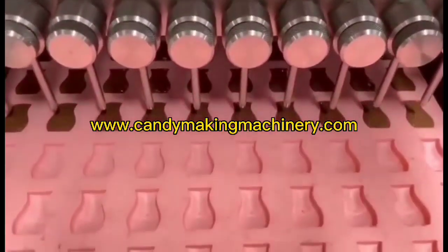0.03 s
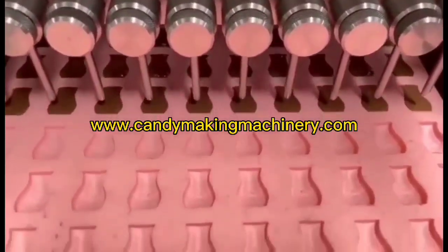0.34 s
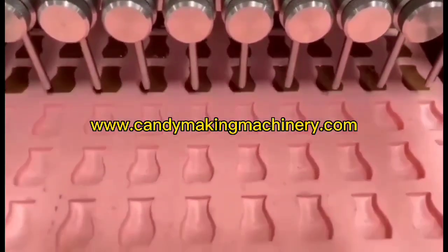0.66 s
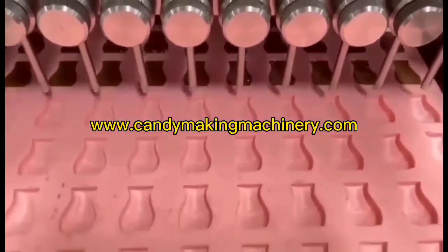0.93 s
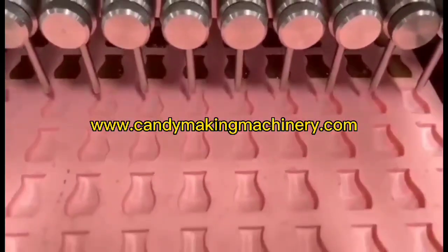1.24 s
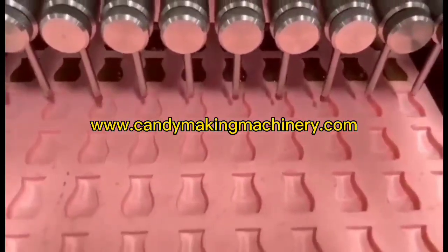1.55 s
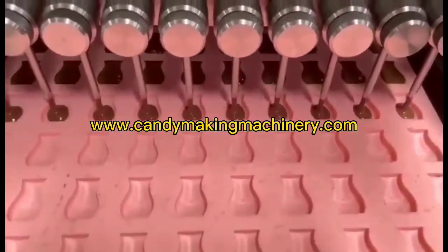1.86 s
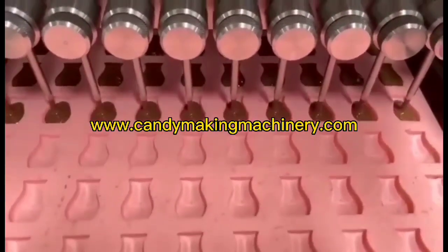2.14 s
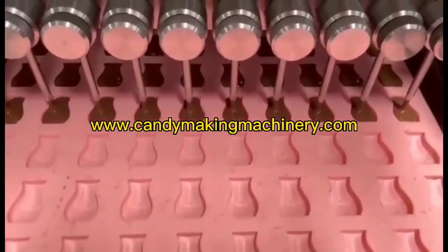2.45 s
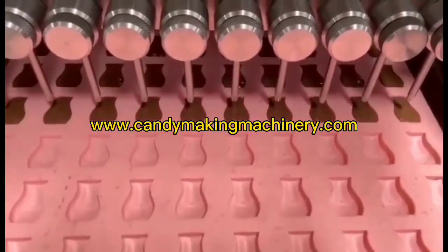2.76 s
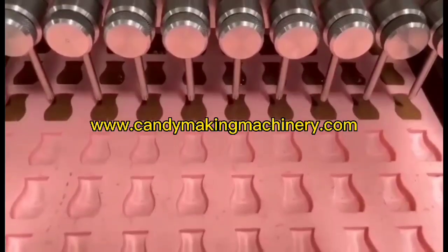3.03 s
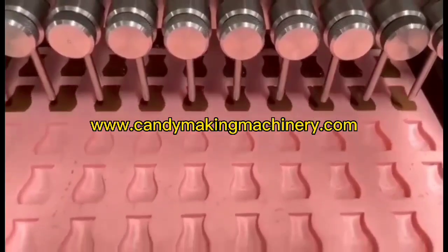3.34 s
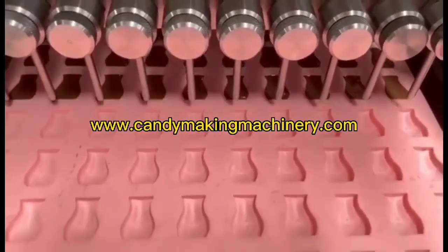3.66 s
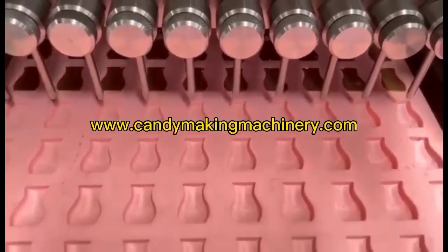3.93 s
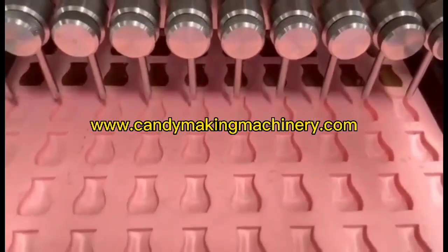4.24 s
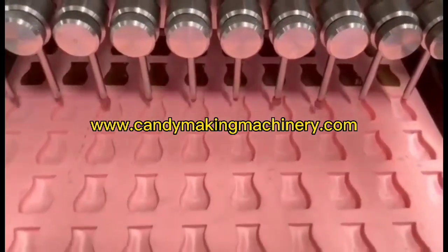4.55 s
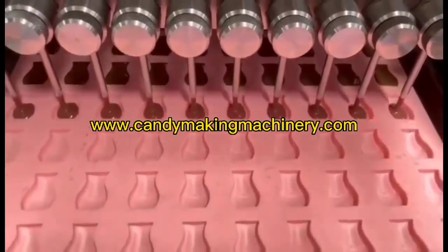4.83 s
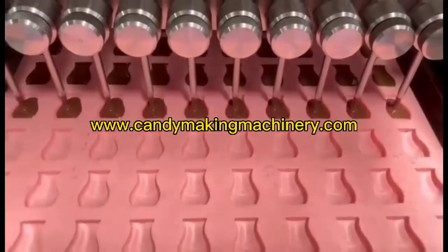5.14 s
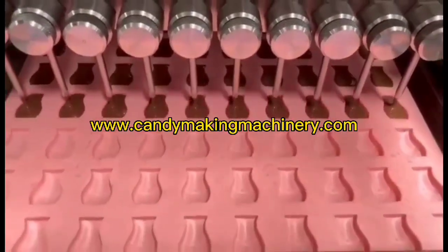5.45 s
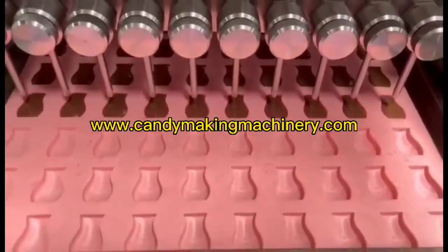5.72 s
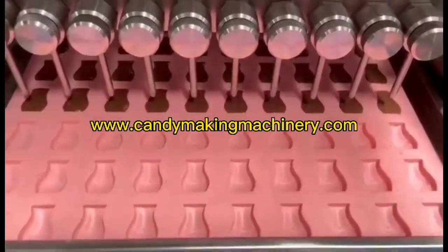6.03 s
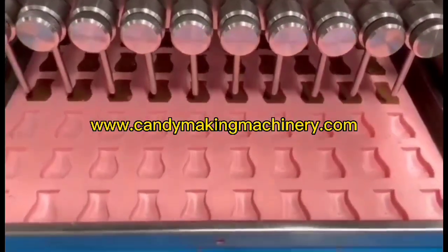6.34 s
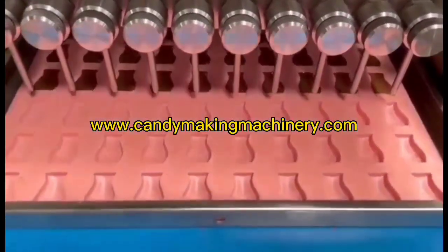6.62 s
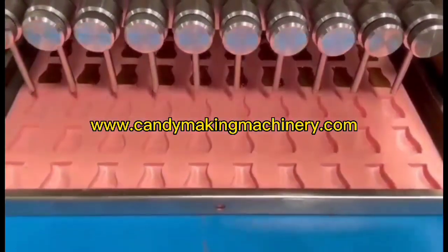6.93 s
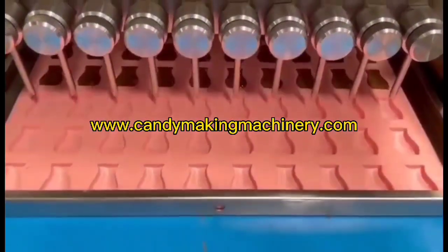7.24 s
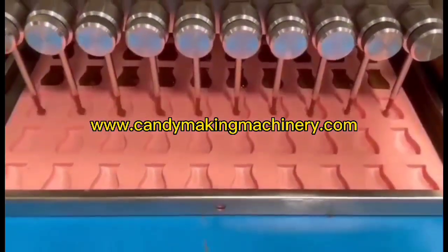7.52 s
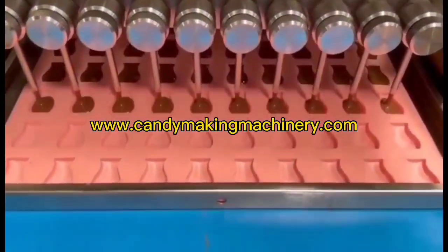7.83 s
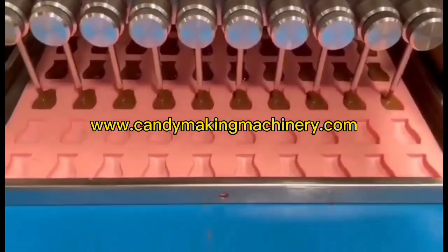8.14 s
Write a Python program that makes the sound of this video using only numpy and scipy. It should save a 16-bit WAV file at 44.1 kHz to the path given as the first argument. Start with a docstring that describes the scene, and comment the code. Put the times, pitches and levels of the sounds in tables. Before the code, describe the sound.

Compressed air leaks and vents in bright bursts while a small factory machine hums, rumbles and knocks softly.

```python
"""A small factory hall, one microphone close to the nozzles of a candy depositor filling trays of moulds.
The drive hums on the orders of one shaft over the rumble of the machinery. Compressed air leaks all
the time and vents in gusts of turbulent noise, some thin and bright, some broad and rushing, with a
few short spits; strong jets half whistle on an edge. Soft knocks of the mechanism ring the frame,
a faint drone comes and goes, and near the end a tray rubs on its guides."""
import sys
import numpy as np
from scipy import signal
from scipy.fft import rfft, irfft, next_fast_len
from scipy.io import wavfile

SR = 44100
rng = np.random.default_rng(int(sys.argv[2]) if len(sys.argv) > 2 else 0)


def to_wav(sig):
    """Store sig (one row per channel, or 1-D mono) as 16-bit WAV at the path in sys.argv[1].

    Samples outside -1..1 are clipped; the rate is SR.
    """
    pcm = np.clip(np.atleast_2d(sig), -1, 1) * 32767
    pcm = np.round(pcm).astype(np.int16)
    wavfile.write(sys.argv[1], SR, pcm.T)  # frames by channels


N = 369558
TIME_S = np.arange(N) / SR


def from_db(db):
    """Decibels to gain."""
    return 10 ** (np.asarray(db) / 20)


def unit_rms(x):
    """Scale to rms 1."""
    return x / np.sqrt(np.mean(x ** 2) + 1e-20)


def curves(rows):
    """Columns of a time table, interpolated per sample."""
    times_s, *columns = np.transpose(rows)
    return [np.interp(TIME_S, times_s, column) for column in columns]


def spectrum_db(spectrum, hz):
    """Spectrum interpolated on a log-frequency axis."""
    points_hz, db = np.transpose(spectrum)
    return np.interp(np.log(hz), np.log(points_hz), db)


def drift(rate_hz):
    """Random wander of rms 1: noise low-passed at rate_hz."""
    step, settle = 40, 2000
    pole = np.exp(-2 * np.pi * rate_hz * step / SR)
    white = rng.standard_normal(N // step + settle + 2)
    slow = signal.lfilter([1], [1, -2 * pole, pole * pole], white)[settle:]
    return np.interp(np.arange(N) / step, np.arange(len(slow)), unit_rms(slow))


def noise(spectrum):
    """Coloured noise of rms 1, falling 20 dB/octave past the spectrum's ends."""
    hz = np.maximum(np.arange(N // 2 + 1) * SR / N, 1)
    octaves_outside = np.abs(np.log2(hz / np.clip(hz, spectrum[0][0], spectrum[-1][0])))
    gain = from_db(spectrum_db(spectrum, hz) - 20 * octaves_outside)
    size = next_fast_len(N)
    bin_gain = np.interp(np.arange(size // 2 + 1) * SR / size, hz, gain)
    return unit_rms(irfft(rfft(rng.standard_normal(size)) * bin_gain, size)[:N])


def resonance(x, hz, width_hz):
    """Two-pole band-pass, peak gain 1."""
    r = np.exp(-np.pi * width_hz / SR)
    feedback = [1, -2 * r * np.cos(2 * np.pi * hz / SR), r * r]
    return signal.lfilter(np.array([1, 0, -1]) * (1 - r * r) / 2, feedback, x)


def tone(hz, waver_db, rate_hz, wander_hz=0):
    """Sine near rms 1 with wavering level and optional pitch wander."""
    turns = np.cumsum(hz + wander_hz * drift(rate_hz)) / SR + rng.random()
    return np.sqrt(2) * np.sin(2 * np.pi * turns) * from_db(waver_db * drift(rate_hz))


def gliding_bands(rows, width_hz, fade_s):
    """One narrow noise band per row: swells, glides, fades."""
    baseband = (drift(width_hz) + 1j * drift(width_hz)) / np.sqrt(2)
    out = np.zeros(N)
    for start_s, length_s, first_hz, last_hz, db in rows:
        span = (TIME_S >= start_s) & (TIME_S < start_s + length_s)
        age_s = TIME_S[span] - start_s
        swell = np.sin(np.pi / 2 * np.clip(np.minimum(age_s, length_s - age_s) / fade_s, 0, 1))
        turns = np.cumsum(first_hz + (last_hz - first_hz) * age_s / length_s) / SR
        wander = np.roll(baseband, rng.integers(N))[span]
        out[span] += np.sqrt(2) * from_db(db) * swell * np.real(wander * np.exp(2j * np.pi * turns))
    return out


def shifting_echoes(x, echo_db, rate_hz, longest_s, count):
    """Short reflections off moving steel: a wandering comb, power kept."""
    echoes, power = 0, 0
    for delay_s in np.linspace(.001, longest_s, count) * rng.uniform(.9, 1.1, count):
        gain = drift(rate_hz)
        echoes = echoes + gain * np.pad(x, (int(delay_s * SR), 0))[:N]
        power = power + gain ** 2
    wet = from_db(echo_db)
    return (x + wet * echoes / np.sqrt(power)) / np.sqrt(1 + wet ** 2)


# machine load (time [s], rumble [dB], drive hum [dB], frame whirr [dB])
LOAD = [(0.0, -48, -47.5, -46), (0.25, -45.5, -46, -43.5), (0.55, -47, -45.5, -49), (0.95, -45, -43, -44),
        (1.25, -47, -44.5, -43), (1.55, -44, -40, -43.5), (1.8, -44, -43.5, -46.5),
        (2.65, -43, -40.5, -44.5), (3.1, -40, -42, -41.5), (3.45, -41.5, -42, -43),
        (4.15, -41.5, -42, -43.5), (4.7, -44.5, -39.5, -39.5), (5.05, -42, -41.5, -41.5),
        (5.47, -39.5, -42.5, -41), (5.8, -43.5, -40, -43.5), (7.05, -45.5, -46, -44.5),
        (7.45, -43.5, -45, -44.5), (7.78, -49.5, -45.5, -39.5), (8.25, -44, -43.5, -49)]
# noise colours (frequency [Hz], relative density [dB])
RUMBLE_SPECTRUM = [(20, -18), (35, -14), (50, -5), (76, 4.5), (92, -5.5), (135, -1.5), (175, -1.5),
                   (225, -5), (275, -0.5), (330, -8.5), (450, -19), (900, -47)]
WHIRR_SPECTRUM = [(220, -2.5), (320, -6.5), (380, -2.5), (430, 0.5), (490, -4), (570, 0), (660, -10),
                  (800, -11), (1200, -12.5), (2500, -47)]
# drive partials (order [x shaft rate])
SHAFT_ORDERS = (7, 8, 14, 20)
# their weights (level [dB re drive hum])
ORDER_LEVELS_DB = [-1.4, -7.5, -15, -18.5]
# mains and other motors (frequency [Hz], level [dB], pitch wander [Hz])
MOTORS = [(50, -61.5, 0), (100, -60.5, 0), (172, -55, 1.8), (273, -56.5, 3.5), (488, -62, 0.5),
          (613.5, -62.5, 0.7)]

def machinery(shaft_hz=29.655):
    """Shaft orders, rumble and frame whirr follow the load; mains and other motors hum beside them."""
    rumble_db, hum_db, whirr_db = curves(LOAD)
    drive = sum(from_db(db) * tone(order * shaft_hz, waver_db=2.5, rate_hz=31)
                for order, db in zip(SHAFT_ORDERS, ORDER_LEVELS_DB))
    motors = sum(from_db(db) * tone(hz, waver_db=4, rate_hz=4.57, wander_hz=wander_hz)
                 for hz, db, wander_hz in MOTORS)
    rumble = from_db(rumble_db + 1.6 * drift(14)) * noise(RUMBLE_SPECTRUM)
    whirr_gain = from_db(whirr_db + 1.3 * drift(19))
    whirr = shifting_echoes(noise(WHIRR_SPECTRUM), echo_db=-3, rate_hz=5, longest_s=.025, count=12)
    return from_db(hum_db) * drive + motors + rumble + whirr_gain * whirr


# constant leak (time [s], hiss [dB], sizzle [dB], rush [dB])
LEAK = [(0.0, -38.5, -45.5, -46.5), (0.62, -45.5, -46, -49.5), (1.0, -42, -40.5, -46),
        (1.6, -43.5, -46.5, -48.5), (1.95, -43, -47, -54), (2.4, -45, -50.5, -51), (2.91, -45, -51, -47.5),
        (3.0, -40.5, -39.5, -47.5), (3.55, -38.5, -39, -49), (4.05, -41.5, -40, -46), (4.5, -35, -40, -39),
        (5.0, -36.5, -40.5, -36), (5.5, -37, -44, -38), (5.82, -40.5, -37, -45), (6.7, -36, -40.5, -47.5),
        (6.765, -41.5, -41.5, -45), (6.83, -35.5, -39.5, -41.5), (7.28, -41, -45.5, -43.5),
        (7.7, -41.5, -42, -50.5), (7.85, -44, -44.5, -46), (8.38, -39.5, -40.5, -41)]
# vented gusts (start [s], attack [s], hold [s], hiss [dB], hiss centre [Hz],
# sizzle [dB re hiss], rush [dB re hiss])
GUSTS = [(0.01, 0.071, 0.028, -32, 3730, -9.5, -14), (0.236, 0.025, 0.025, -30, 4840, -14, -30),
         (0.335, .03, 0.13, -43, 3700, -5, -1), (0.733, 0.034, 0.061, -42.5, 3850, 2.5, -5),
         (0.989, 0.039, 0.08, -35.5, 4120, -4.5, -5.5), (1.172, 0.02, 0.011, -36, 3820, -2, -2),
         (1.323, 0.03, 0.082, -40.5, 3920, -1, -2), (1.507, 0.026, 0.089, -47, 4300, 6, -5),
         (2.948, 0.03, 0.035, -40, 4500, 3.5, -8), (3.27, 0.036, 0.071, -49, 4100, -10, -14),
         (3.644, .025, 0.04, -41.5, 4100, -17, 2), (4.138, 0.03, 0.044, -33.5, 3570, -3.5, -7.5),
         (4.214, 0.023, 0.039, -39.5, 3580, -20, -1.5), (4.57, 0.042, 0.044, -44, 4370, 8.5, -22),
         (4.788, 0.024, 0.062, -37.5, 3970, 0, -11), (5.01, 0.038, 0.2, -26, 4250, -8.5, -20),
         (5.243, 0.031, 0.08, -28.5, 3600, -8, -12), (5.51, 0.054, 0.065, -33, 3530, -7, -17),
         (5.615, 0.042, 0.19, -34, 6700, -11, -22), (5.85, 0.049, 0.2, -27.5, 4580, -5.5, -13.5),
         (6.106, 0.028, 0.065, -30, 4970, -16, -14), (6.189, 0.047, 0.22, -30.5, 3040, -14, -4),
         (6.444, 0.073, 0.048, -27.5, 5100, -3.5, -12.5), (6.582, 0.018, 0.02, -41, 4000, -10, 1),
         (6.81, 0.084, 0.18, -28.5, 4930, -6, -20), (7.01, 0.055, 0.14, -29, 5100, -11.5, -12),
         (7.301, 0.018, 0.022, -31, 4730, -11, -11), (7.369, 0.048, 0.033, -28, 4540, -5.5, -19),
         (7.47, 0.024, 0.018, -26, 4760, -7.5, -25), (7.541, 0.019, 0.023, -32.5, 3900, -2.5, -9),
         (7.815, 0.11, 0.31, -34, 4100, -5, -9.5), (7.965, 0.029, 0.058, -31, 4000, -3.5, -23)]

def airflow(leak_centre_hz=4180, release_db_per_s=189):
    """Leak and valve gusts add in power: hiss, sizzle and rush gains, power-weighted hiss centre."""
    hiss, sizzle, rush = [from_db(db) ** 2 for db in curves(LEAK)]
    weighted_hz = hiss * leak_centre_hz
    for start_s, attack_s, hold_s, db, centre_hz, sizzle_db, rush_db in GUSTS:
        first = int(start_s * SR)
        span = np.arange(first, min(first + SR, N))
        age_s = TIME_S[span] - start_s
        shut_s = np.maximum(age_s - attack_s - hold_s, 0)   # pressure collapses once the valve shuts
        power = (np.clip(age_s / attack_s, 0, 1) * from_db(db - release_db_per_s * shut_s)) ** 2
        hiss[span] += power
        weighted_hz[span] += power * centre_hz
        sizzle[span] += power * from_db(sizzle_db) ** 2
        rush[span] += power * from_db(rush_db) ** 2
    return np.sqrt(hiss), np.sqrt(sizzle), np.sqrt(rush), weighted_hz / hiss


def turbulence(spectrum, centre_hz, hump_db, hump_octaves, flicker_db, flicker_hz, bands):
    """Independently flickering noise bands under a spectral hump; power near 1."""
    edges_hz = np.geomspace(spectrum[0][0], spectrum[-1][0], bands + 1)
    white = rng.standard_normal((2, N))
    out, power = 0, 0
    for k, (low_hz, high_hz) in enumerate(zip(edges_hz, edges_hz[1:])):
        hz = np.sqrt(low_hz * high_hz)
        bandpass = signal.butter(2, [low_hz, high_hz], "band", fs=SR, output="sos")
        band = unit_rms(signal.sosfilt(bandpass, white[k % 2]))
        lift_db = hump_db * np.exp(-.5 * (np.log2(hz / centre_hz) / hump_octaves) ** 2)
        gain = from_db(spectrum_db(spectrum, hz) + lift_db) * np.sqrt(high_hz - low_hz)
        out = out + band * gain * from_db(flicker_db * drift(flicker_hz))
        power = power + gain ** 2
    return out / np.sqrt(power)


# air colours (frequency [Hz], relative density [dB])
HISS_SPECTRUM = [(1200, -10), (1900, 1.5), (2250, 4), (3200, 0), (4800, 2), (6400, 1), (7400, 2.5),
                 (9500, -39), (13000, 8)]
SIZZLE_SPECTRUM = [(4000, -47), (7000, 5), (8800, 9), (10000, 4), (11200, 6), (13500, -11)]
RUSH_SPECTRUM = [(400, -0.5), (600, 0.5), (900, -3), (1200, 1.5), (1700, -0.5), (2300, 2.5), (3500, -0.5),
                 (6000, -48)]
# edge tones at full force (frequency [Hz], width [Hz], gain [dB])
EDGE_TONES = [(4620, 300, -14), (5020, 200, -11), (5620, 60, -10)]
# spectral dips at full force (frequency [Hz], width [Hz], depth [0-1])
HISS_DIPS = [(1880, 320, 0.5), (7100, 750, 0.42)]

def jet(flutter_db=0.7, flutter_hz=54):
    """Turbulent hiss, thin sizzle and a low rush off nearby surfaces, fluttering together."""
    hiss_gain, sizzle_gain, rush_gain, centre_hz = airflow()
    force = np.clip((20 * np.log10(hiss_gain) + 54) / 18, 0, 1)   # 0 at -54 dB, 1 at -36 dB
    hiss = hiss_gain * turbulence(HISS_SPECTRUM, centre_hz, hump_db=17.8 * force, hump_octaves=1,
                                  flicker_db=2.5, flicker_hz=22, bands=16)
    hiss += force ** 2 * sum(from_db(db) * resonance(hiss, hz, width) for hz, width, db in EDGE_TONES)
    hiss -= force * sum(depth * resonance(hiss, hz, width) for hz, width, depth in HISS_DIPS)
    sizzle = turbulence(SIZZLE_SPECTRUM, centre_hz=12440, hump_db=7.3 * force, hump_octaves=0.07,
                        flicker_db=3.5, flicker_hz=15.3, bands=10)
    sizzle *= sizzle_gain * from_db(1.15 * drift(26))
    rush = rush_gain * from_db(drift(6)) * noise(RUSH_SPECTRUM)
    return (hiss + sizzle + rush) * from_db(flutter_db * drift(flutter_hz))


# panel and cavity resonances (frequency [Hz], width [Hz], gain [dB])
CAVITIES = [(1448, 55, -2.5), (2927, 30, -3), (3335, 55, -4), (3640, 80, -12), (3908, 50, -11),
            (4630, 32, -7), (6070, 120, -15), (6466, 35, -8)]

def steel_housing(air):
    """Air noise reflects off moving steel and rings in panels and cavities."""
    echoed = shifting_echoes(air, echo_db=-1, rate_hz=15.6, longest_s=.009, count=20)
    return echoed + sum(from_db(db) * resonance(echoed, hz, width) for hz, width, db in CAVITIES)


# blows of dosing mechanism and trays (time [s], level [dB], most excited pitch [Hz])
KNOCKS = [(0.24, -34, 520), (1.01, -29, 470), (1.193, -30, 1190), (1.518, -30.5, 760), (2.539, -35, 800),
          (4.419, -28, 760), (5.422, -29, 600), (6.021, -30, 540), (6.267, -28, 600), (7.33, -30, 720),
          (8.05, -32, 900)]
# frame modes (frequency [Hz], gain [dB], t60 [s])
FRAME_MODES = [(290, 2, 0.16), (370, -12, 0.051), (471, -2.5, 0.12), (557, -10.5, 0.16), (614, -10, 0.12),
               (725, -9, 0.096), (840, -6, 0.14), (1000, -12, 0.13), (1163, -5, 0.18), (1460, -8, 0.06)]

def knocks(spread_octaves=0.33, scatter_db=2.5):
    """Each blow rings the frame's modes, mostly those near its own pitch."""
    times_s, level_db, focus_hz = np.transpose(KNOCKS)
    onsets = np.round(times_s * SR).astype(int)
    random_db = rng.normal(0, scatter_db, (len(KNOCKS), len(FRAME_MODES)))
    out = np.zeros(N)
    for k, (hz, mode_db, t60_s) in enumerate(FRAME_MODES):
        coupling = np.exp(-.5 * (np.log2(hz / focus_hz) / spread_octaves) ** 2)
        blows = np.full(N, 1e-18)
        blows[onsets] = coupling * from_db(level_db + mode_db + random_db[:, k]) * (-1) ** k
        r = from_db(-60 / (t60_s * SR))
        angle = 2 * np.pi * hz / SR
        out += signal.lfilter([0, np.sin(angle)], [1, -2 * r * np.cos(angle), r * r], blows)
    return out


# air spits (peak time [s], level [dB], length [s])
SPITS = [(0.272, -34, .025), (2.773, -41, 0.063), (2.969, -30.5, 0.032), (3.541, -31, 0.011),
         (4.17, -43, .018), (5.936, -19, 0.0063), (6.077, -22.5, 0.0089), (6.143, -35, 0.0044),
         (6.458, -32, 0.015), (6.907, -30, 0.013), (7.07, -25, 0.014)]
# spit colour (frequency [Hz], relative density [dB])
SPIT_SPECTRUM = [(1500, -7.5), (3000, 2), (5000, 0), (8000, 5), (11000, -1.5), (13500, -5)]

def spits():
    """Brief escapes of air: Gaussian swells of bright noise."""
    swells = sum(from_db(db) * np.exp(-2 * ((TIME_S - peak_s) / length_s) ** 2)
                 for peak_s, db, length_s in SPITS)
    return swells * noise(SPIT_SPECTRUM)


# hall drone (start [s], length [s], first pitch [Hz], last pitch [Hz], level [dB])
DRONES = [(2.85, 1.2, 406.5, 410, -51.5)]

def drone():
    """A faint, nearly pure tone comes and goes in the hall."""
    return gliding_bands(DRONES, width_hz=5, fade_s=0.17)


# jet whistles (start [s], length [s], first pitch [Hz], last pitch [Hz], level [dB])
WHISTLES = [(4.2, 0.09, 5480, 5420, -39), (4.23, 0.1, 3110, 3140, -37), (4.59, 0.19, 4830, 4790, -39.5),
            (4.8, 0.13, 3090, 3110, -38), (4.8, 0.13, 3680, 3610, -37), (4.81, 0.11, 4680, 4440, -34),
            (5.04, 0.16, 5080, 5090, -32), (5.04, 0.19, 4500, 4900, -34), (5.05, 0.25, 6080, 6130, -37.5),
            (5.3, 0.09, 2290, 2290, -36), (5.3, 0.09, 4000, 4150, -34), (5.89, 0.17, 4480, 4270, -33),
            (6.06, 0.15, 5250, 5450, -34), (6.26, 0.21, 2230, 2100, -38), (6.49, 0.1, 4950, 5100, -33.5),
            (6.51, 0.08, 5580, 5500, -35.5), (6.86, 0.28, 5580, 5630, -37.5), (7.0, 0.23, 4640, 4500, -38),
            (7.44, 0.1, 5250, 5380, -32), (7.46, 0.07, 4720, 4820, -32), (7.97, 0.25, 3120, 3160, -39)]

def whistles():
    """A strong jet half whistles on an edge."""
    return gliding_bands(WHISTLES, width_hz=110, fade_s=0.043)


# tray rubs (start [s], length [s], first pitch [Hz], last pitch [Hz], level [dB])
TRAY_RUBS = [(7.13, 0.13, 570, 543, -42.5), (7.66, 0.39, 500, 537, -46)]

def tray_rubs():
    """A tray rubs on its guides with a rough, gliding pitch."""
    return gliding_bands(TRAY_RUBS, width_hz=98, fade_s=0.043)


def scene():
    """All sources at one microphone, alike in both channels."""
    mono = whistles() + tray_rubs() + drone() + steel_housing(jet() + spits()) + machinery() + knocks()
    return np.tile(mono, (2, 1))


def record(dry, notch_hz=(7500, 9250), cutoff_hz=13600):
    """Deep treble notch, then a steep low-pass."""
    notch = signal.butter(6, notch_hz, "bandstop", fs=SR, output="sos")
    lowpass = signal.ellip(10, .3, 80, cutoff_hz, fs=SR, output="sos")
    return signal.sosfilt(lowpass, signal.sosfilt(notch, dry))


dry = scene()
out = record(dry)
to_wav(out)
```